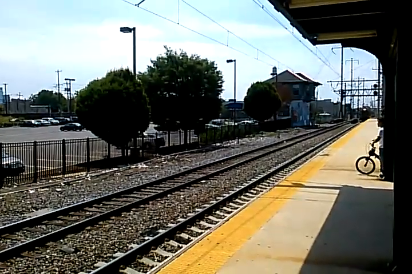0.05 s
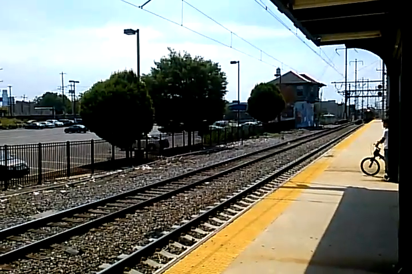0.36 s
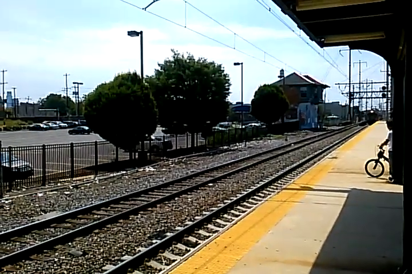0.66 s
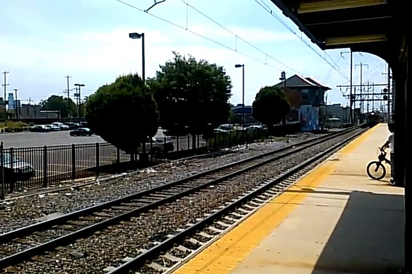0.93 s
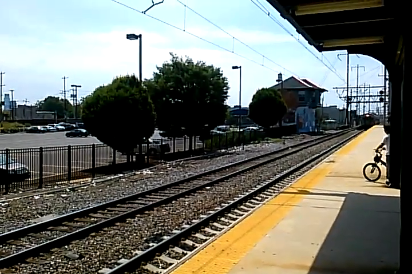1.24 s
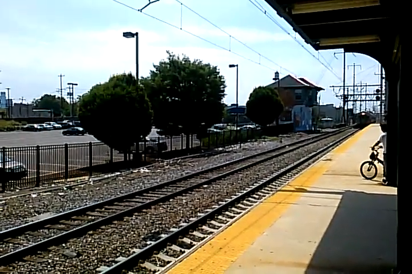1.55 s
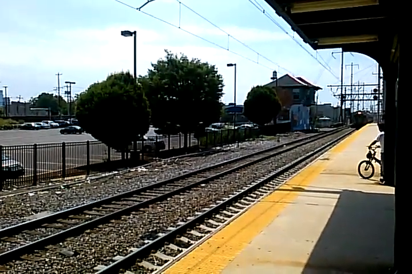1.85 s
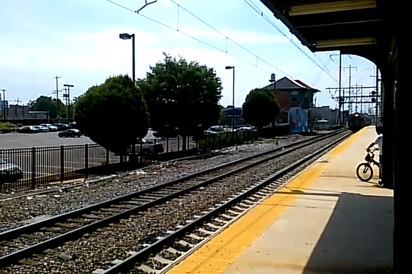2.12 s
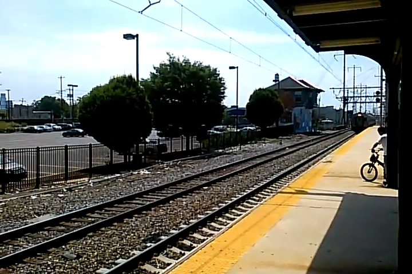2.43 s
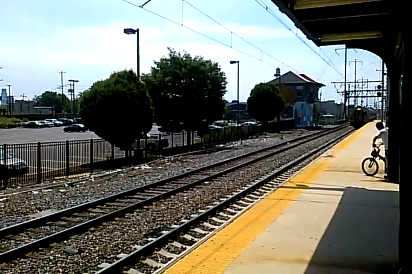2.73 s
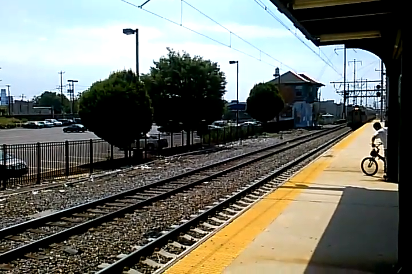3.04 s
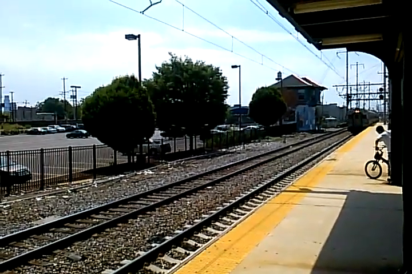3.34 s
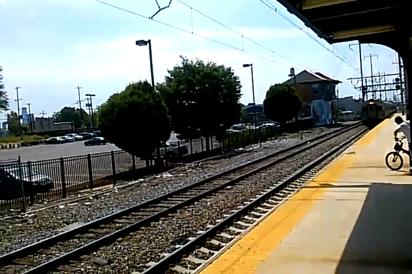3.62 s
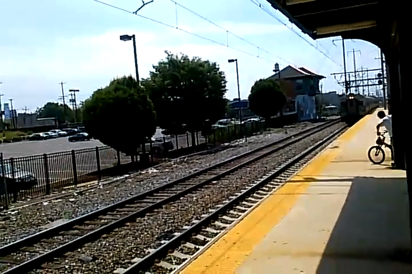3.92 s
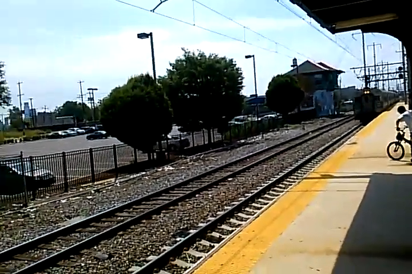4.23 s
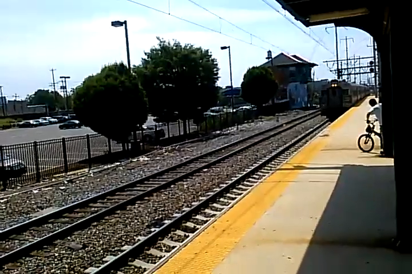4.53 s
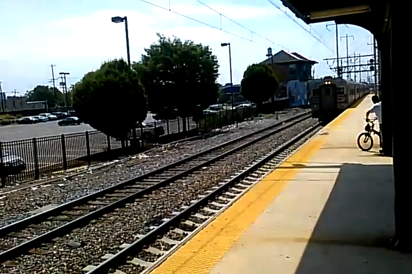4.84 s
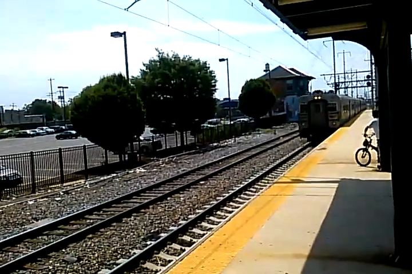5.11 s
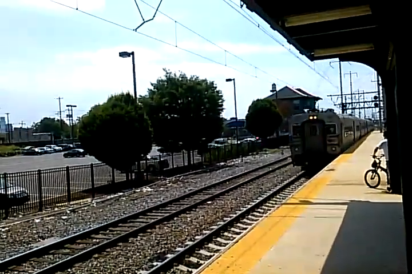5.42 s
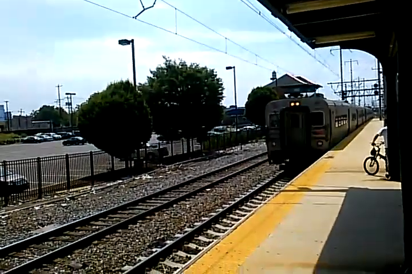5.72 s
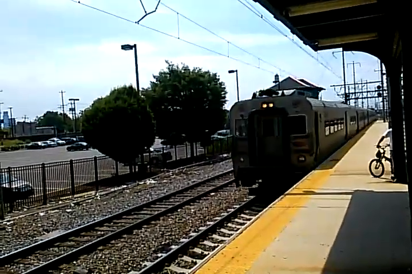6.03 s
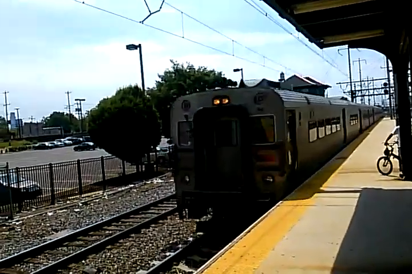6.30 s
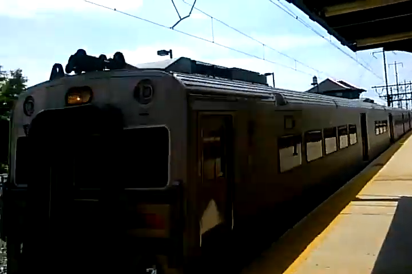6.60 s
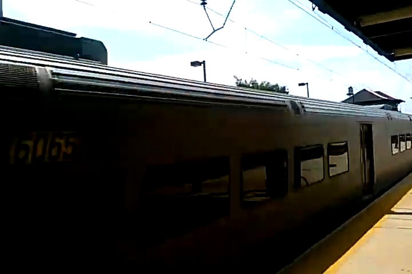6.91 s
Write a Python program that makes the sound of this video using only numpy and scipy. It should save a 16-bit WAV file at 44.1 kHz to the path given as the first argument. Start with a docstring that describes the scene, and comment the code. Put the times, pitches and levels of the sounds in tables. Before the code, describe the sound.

At an outdoor station platform, the rails sing with a piercing, very high tone that swells in uneven pulses over a growing sizzle. Faint knocks travel along the steel as falling chirps, and a breeze rumbles on the microphone. An electric train draws near with a rising roar, ringing wheels, hiss and quick dull thumps. At the very end, the air it pushes buffets the microphone.

```python
"""First you hear the rails sing: a piercing, beating tone near 11 kHz that swells over sizzle and wind.
Far knocks travel through the steel and arrive as falling chirps. An electric commuter train is running
up to the platform at speed: its wheels ring, the track roars and a flat spot thumps once a turn.
It arrives at the very end, and the air it pushes ahead (its bow wave) buffets the microphone.
The camera's gain control turns everything down whenever the song swells."""
import sys
import numpy as np
from scipy import signal
from scipy.fft import rfft, irfft
from scipy.io import wavfile

SR = 44100
rng = np.random.default_rng(int(sys.argv[2]) if len(sys.argv) > 2 else 0)


def to_wav(sig):
    """Store sig (one row per channel, or 1-D mono) as 16-bit WAV at the path in sys.argv[1].

    Samples outside -1..1 are clipped; the rate is SR.
    """
    pcm = np.clip(np.atleast_2d(sig), -1, 1) * 32767
    pcm = np.round(pcm).astype(np.int16)
    wavfile.write(sys.argv[1], SR, pcm.T)  # frames by channels


N = 306936
TIME = np.arange(N) / SR
FREQ = np.maximum(np.arange(N // 2 + 1) * SR / N, 1)
SPEED_M_S = 24
ARRIVES_S, TRACK_M = 6.544, 6.83  # when the front wheels draw level, and how far away they pass

# How strongly the rails sizzle. Each row: time in seconds, level in dB.
SIZZLE_LEVELS = [(0, -39.5), (.4, -40.5), (.7, -32), (1.0, -42.5), (1.42, -42), (1.54, -30), (1.8, -22),
                 (1.95, -34), (2.17, -20), (2.3, -30), (2.5, -22), (3.4, -17.5), (4.0, -19.5), (4.2, -15),
                 (4.45, -16), (5.7, -10), (6.6, -10.5), (6.96, -8)]


def undb(db):
    """Turn decibels into a gain to multiply by."""
    return 10 ** (np.asarray(db) / 20)


def unit(x):
    """Scale a signal so that its typical size (standard deviation) is 1."""
    return x / np.std(x)


def colour(points):
    """Join (Hz, dB) points into a full spectrum in dB, silent beyond its ends."""
    hz, db = np.transpose(points)
    return np.interp(np.log(FREQ), np.log(hz), db, left=-120, right=-120)


def noise(db):
    """Noise of typical size 1; the spectrum in dB sets only its tone colour."""
    real, imaginary = rng.standard_normal((2, len(FREQ)))
    return unit(irfft((real + 1j * imaginary) * undb(db), N))


def walk(rate):
    """A smooth random wobble of typical size 1 that changes about rate times a second."""
    return noise(-10 * (FREQ / max(rate, 1)) ** 2)


def ripple(spacing_hz):
    """Random peaks and dips for a spectrum, like the many resonances of a long steel body."""
    heights = rng.standard_normal(N // 2 + 1)
    return unit(np.interp(FREQ / spacing_hz, np.arange(len(heights)), heights))


def peak(hz, width_hz):
    """The power of one resonance at each frequency, 1 at its centre."""
    return 1 / (1 + ((FREQ / hz - hz / FREQ) * hz / width_hz) ** 2)


def band_noise(hz, width_hz):
    """Noise gathered around one pitch."""
    return noise(20 * np.log10(peak(hz, width_hz)))


def swells(rows, rise_db_s, fall_db_s):
    """A gain that rises to each row's start, holds its level and falls after its end."""
    power = 0
    for start, end, db in rows:
        before, after = np.maximum(start - TIME, 0), np.maximum(TIME - end, 0)
        power = power + undb(db - rise_db_s * before - fall_db_s * after) ** 2
    return np.sqrt(power)


def approach(near_db, spread, loss_db_m):
    """A gain that grows until the train arrives: sound spreads out and fades with each metre."""
    distance = np.hypot(SPEED_M_S * np.maximum(ARRIVES_S - TIME, 0), TRACK_M)
    return undb(near_db - loss_db_m * (distance - TRACK_M)) * (TRACK_M / distance) ** spread


def rail_tones(rows, drift_hz, waver_db, main_hz=11129):
    """The wheels keep the rail ringing; each tone wanders a little in pitch and strength."""
    tones = 0
    for offset, db in rows:
        hz = main_hz + offset + drift_hz * walk(4)
        tones = tones + undb(db + waver_db * walk(6)) * np.sin(2 * np.pi * np.cumsum(hz) / SR)
    return unit(tones)


def rail_song(murmur_db=-7):
    """A piercing tone beats with its neighbours; close by, friction turns it into a rough screech."""
    # The song's swells. Each row: start and end in seconds, level in dB, then the partners
    # and the lower group in relative dB.
    song_swells = [(0, .1, -24, -1.5, -19), (0.152, 0.618, -13.5, -18, -14), (0.792, 0.88, -13, -23, -14.5),
                   (0.942, 1.017, -5, -17, -14.5), (1.066, 1.153, -14.5, 5, -7.5),
                   (1.566, 1.675, -13.5, -17, -6.5), (1.871, 1.946, -2, -4, -17),
                   (1.987, 2.228, 4, -6.5, -16), (2.845, 2.9, 0.5, -31, -9.5),
                   (3.417, 3.49, 9.5, -6.5, -15.5), (3.858, 3.925, 2, -13, -22),
                   (4.025, 4.054, 13, -12.5, -18), (4.346, 4.622, 2.5, 0.5, -13.5),
                   (4.61, 4.92, 5.5, -10.5, -15.5), (5.02, 5.22, 4.5, -16, -22),
                   (5.318, 5.575, 2.5, -3, -17), (5.875, 6.136, 1, -9.5, -14.5),
                   (6.444, 6.732, 9, -11, -11.5)]
    # Rail tones that beat with the main one. Each row: offset from it in Hz, level in dB.
    partner_tones = [(22.5, 0), (-42, -13), (-55, -14)]
    # A rougher group just below. Each row: offset in Hz, level in dB.
    lower_tones = [(-189, 0), (-209, -6), (-143, -9)]
    # The scraping noise around the tones. Each row: frequency in Hz, level in dB.
    scrape_colour = [(10500, -50), (10850, -16), (11000, -8), (11100, 0), (11160, 0), (11220, -11),
                     (11350, -19), (11480, -45)]
    # The screech. Each row: frequency in Hz, level in dB.
    screech_colour = [(9500, -47), (10600, -14), (11150, 16), (11400, -37), (11620, 13), (11800, -16),
                      (12280, -1), (12500, -35), (14000, -54)]
    # A thin side tone while the train is far. Each row: start and end in seconds, level in dB.
    side_swells = [(0, .5, -37), (.92, 1.16, -25.5)]
    slopes = dict(rise_db_s=230, fall_db_s=163)
    start, end, db, partner_db, lower_db = np.transpose(song_swells)
    main_db = db - 10 * np.log10(1 + undb(partner_db) ** 2)  # main tone and partners share the power
    main_gain = swells(zip(start, end, main_db), **slopes)
    partner_gain = swells(zip(start, end, main_db + partner_db), **slopes)
    lower_gain = swells(zip(start, end, db + lower_db), **slopes)
    main = rail_tones([(0, 0)], drift_hz=1.2, waver_db=.2)
    partners = rail_tones(partner_tones, drift_hz=1.2, waver_db=.8) + .45 * noise(colour(scrape_colour))
    lower = rail_tones(lower_tones, drift_hz=2.7, waver_db=1.0) + undb(2.5) * noise(colour(scrape_colour))
    tone = main_gain * main + partner_gain * partners + lower_gain * lower
    # between swells the sizzle keeps the tones faintly alive
    murmur = undb(murmur_db + np.interp(TIME, *np.transpose(SIZZLE_LEVELS)))
    murmur *= unit(main + partners + lower)
    harshness = approach(near_db=1.5, spread=1.64, loss_db_m=0)
    screech = harshness * np.hypot(main_gain, partner_gain) * noise(colour(screech_colour) + ripple(26))
    side = swells(side_swells, **slopes) * band_noise(hz=11880, width_hz=110)
    return (tone + screech) / np.sqrt(1 + harshness ** 2) + murmur + side


def rail_sizzle():
    """Rough steel rolls on steel and stirs the rail's many high resonances."""
    # The sizzle. Each row: frequency in Hz, level in dB.
    sizzle_colour = [(3500, -31.5), (5400, -22), (6200, -13), (7000, -13), (8700, -2.5), (10000, -0.5),
                     (11000, -2.5), (12200, -2), (13000, -10), (14400, -8), (15700, -20)]
    spectrum = colour(sizzle_colour) + 2.8 * ripple(12)
    level_db = np.interp(TIME, *np.transpose(SIZZLE_LEVELS)) + 1.7 * walk(16.7)
    return undb(level_db) * noise(spectrum)


def track_roar(far_db=-34):
    """A far wash of noise gives way to the deep resonances of the track as the train nears."""
    # The wash. Each row: frequency in Hz, level in dB.
    wash_colour = [(60, 16), (170, 1.5), (280, 5), (550, -1), (1000, 2.5), (1300, 0), (1520, 1),
                   (1680, -6.5), (2400, -7), (4000, -24.5)]
    # Resonances of track and car bodies. Each row: pitch in Hz, width in Hz, level in dB.
    resonances = [(160, 11, -9), (256, 15, -7.5), (322, 22, 0), (461.7, 80, 3), (630, 94, -1), (725, 50, 7),
                  (790, 120, -4.5), (938, 56, -1.5), (1000, 160, -7)]
    wash = noise(colour(wash_colour) + 2 * ripple(24.83))
    wash *= undb(far_db) + approach(near_db=-23, spread=1.24, loss_db_m=0.05)
    power = sum(undb(db) ** 2 * peak(hz, width) ** 2.07 for hz, width, db in resonances)
    track = approach(near_db=-16, spread=.45, loss_db_m=0.1348) * noise(10 * np.log10(power))
    return undb(2.4 * walk(16.3)) * (wash + track)


def wind(breeze_db=-24, hiss_db=-61):
    """A gusty breeze buffets the microphone over a faint, steady outdoor hiss."""
    # The gusts. Each row: start and end in seconds, level in dB.
    gusts = [(.08, .32, -21), (.78, .85, -14), (3.65, 3.9, -21), (4.25, 4.75, -20), (4.84, 4.88, -13.5),
             (5.7, 6.8, -17.5)]
    # The wind's rumble. Each row: frequency in Hz, level in dB.
    wind_colour = [(8, -6), (22, 1.5), (35, 0), (50, -2), (72, -5.5), (110, -13), (170, -23.5), (400, -31),
                   (1200, -59)]
    strength = np.hypot(undb(breeze_db), swells(gusts, rise_db_s=180, fall_db_s=145))
    buffet = strength * undb(2.55 * walk(8.0)) * noise(colour(wind_colour))
    return buffet + undb(hiss_db) * band_noise(hz=4500, width_hz=2500)


def swish():
    """Two short, bright scrapes with a few resonances, early on."""
    # The scrapes. Each row: start and end in seconds, level in dB.
    scrapes = [(.5, .6, -33), (.65, .76, -29)]
    # Their tone colour. Each row: frequency in Hz, level in dB.
    swish_colour = [(150, -40), (250, -5), (393, -4), (438, -10), (489, 0), (554, -18), (608, -31),
                    (986, -18), (1210, -32), (1330, -24), (1870, -18), (2290, -4), (3380, -19), (3830, -13),
                    (4340, -25), (7150, -7), (10400, -13), (13500, -42), (22000, -120)]
    gain = swells(scrapes, rise_db_s=107, fall_db_s=206.5)
    return gain * noise(colour(swish_colour) + 2.5 * ripple(60))


def far_knocks(rise_s=0.0032, travel_s=0.0509):
    """High notes run faster along a bending rail, so each far knock arrives as a falling chirp."""
    # The knocks. Each row: start in seconds, level in dB, decay time in seconds.
    knocks = [(.9, -29.5, 0.042), (1.222, -31.5, 0.17), (1.274, -26.5, 0.049), (1.335, -36, 0.05),
              (1.68, -30.5, 0.16), (2.06, -21.5, .04), (2.59, -31, 0.065), (3.012, -23, 0.042),
              (3.16, -27, 0.062), (3.74, -30, 0.1), (4.352, -15.5, 0.037), (5.012, -19.5, 0.087)]
    # The struck steel. Each row: frequency in Hz, level in dB.
    steel_colour = [(350, -50), (750, 12), (1100, 9.5), (1520, 9.5), (1700, -12), (2200, 0), (3000, -47)]
    force = 0
    for start, db, decay in knocks:
        age = np.maximum(TIME - start, 0)
        force = force + undb(db) * (1 - np.exp(-age / rise_s)) * np.exp(-age / decay)
    steel = noise(colour(steel_colour) + 2.0 * ripple(30.9))
    lag_s = travel_s * (np.sqrt(1600 / np.maximum(FREQ, 200)) - 1)  # delay behind the 1600 Hz part
    phase = 2 * np.pi * np.cumsum(lag_s) * SR / N
    return irfft(rfft(force * steel) * np.exp(-1j * phase), N)


def wheel_ring():
    """Rolling makes the wheels ring near 2 kHz; a few notes swell and fade on their own."""
    # The wheels' notes. Each row: pitch in Hz, width in Hz, level in dB.
    wheel_notes = [(1951, 39, -10), (2137, 29, -9.5), (2197, 93, -9), (2313, 110, -15.5)]
    # The broad ring under them. Each row: frequency in Hz, level in dB.
    wheel_colour = [(1350, -56), (1720, -5.5), (1930, 0.5), (2130, 5.5), (2360, 1), (2480, -18),
                    (2900, -18), (3300, -48)]
    notes = sum(undb(db + 3.9 * walk(8.0)) * band_noise(hz, width) for hz, width, db in wheel_notes)
    flutter = undb(1.13 * walk(31))
    broad = noise(colour(wheel_colour) + 1.9 * ripple(20))
    return approach(near_db=-17.5, spread=.1, loss_db_m=0.2543) * flutter * unit(broad + notes)


def air_rush():
    """Air rushes ahead of the train with a bright hiss."""
    # The rush. Each row: frequency in Hz, level in dB.
    rush_colour = [(700, -28), (1500, -4.5), (2700, 4.5), (3150, -3), (3700, 2), (4400, 0.5), (5300, 0.5),
                   (7000, 7.5), (9000, 4.5), (15000, -52)]
    gain = approach(near_db=-13, spread=0.24, loss_db_m=0.44)
    return gain * noise(colour(rush_colour) + 2.55 * ripple(40))


def wheel_flat(wheel_round_m=2.875, strike_s=6.068, rise_s=0.018, ring_s=0.026):
    """A worn spot pounds the rail on each turn, and the sleepers below answer dully."""
    # The thump. Each row: frequency in Hz, level in dB.
    thump_colour = [(70, -12), (170, 8.5), (290, 7.5), (460, 1.5), (600, 3), (1200, -32)]
    turn_s = wheel_round_m / SPEED_M_S
    age = (TIME - strike_s) % turn_s  # the other strikes lie whole turns from strike_s
    force = np.exp(-age / ring_s) + np.exp((age - turn_s) / rise_s)
    return approach(near_db=-6.5, spread=0.77, loss_db_m=0.5) * force * noise(colour(thump_colour))


def ground_throb(throb_hz=26, wander_hz=2.73):
    """The ground throbs under the weight of the nearing cars."""
    # The throbs. Each row: start and end in seconds, level in dB.
    throbs = [(5.76, 6.05, -8.5), (6.22, 6.96, -8)]
    phase = 2 * np.pi * np.cumsum(throb_hz + wander_hz * walk(6.05)) / SR
    return swells(throbs, rise_db_s=190, fall_db_s=133) * np.sqrt(2) * np.sin(phase)


def bow_wave():
    """The air pushed by the train's nose hits the microphone."""
    # The blasts. Each row: start and end in seconds, level in dB.
    blasts = [(6.77, 6.86, -5), (6.89, 6.96, 3.5)]
    # Their deep tone colour. Each row: frequency in Hz, level in dB.
    blast_colour = [(15, 3), (60, 5), (82, 2.5), (110, -7), (145, 5), (230, -9), (500, -16.5), (1000, -29),
                    (3000, -29)]
    return swells(blasts, rise_db_s=214, fall_db_s=120) * noise(colour(blast_colour))


def gain_control(x, knee_db=-26.5, ratio=1.827, react_s=0.015):
    """The gain falls as the power, smoothed with a short look-ahead, rises above the knee level."""
    keep = np.exp(-1 / (react_s * SR))
    power = signal.filtfilt([1 - keep], [1, -keep], x ** 2, padtype="even", padlen=SR // 10)
    return x * (1 + power / undb(knee_db) ** 2) ** ((1 / ratio - 1) / 2)


def scene():
    """Everything as it reaches the platform, in one channel."""
    early = rail_song() + rail_sizzle() + track_roar() + wind() + swish() + far_knocks()
    late = wheel_ring() + air_rush() + wheel_flat() + ground_throb() + bow_wave()
    return (early + late)[None]


def record(dry):
    """The camera turns loud moments down, clips the highest peaks and cuts the top treble."""
    treble_cut = signal.ellip(12, .1, 90, 15700, fs=SR, output="sos")
    return signal.sosfilt(treble_cut, np.clip(gain_control(dry), -.9, .9))


dry = scene()
out = record(dry)
to_wav(out)
```